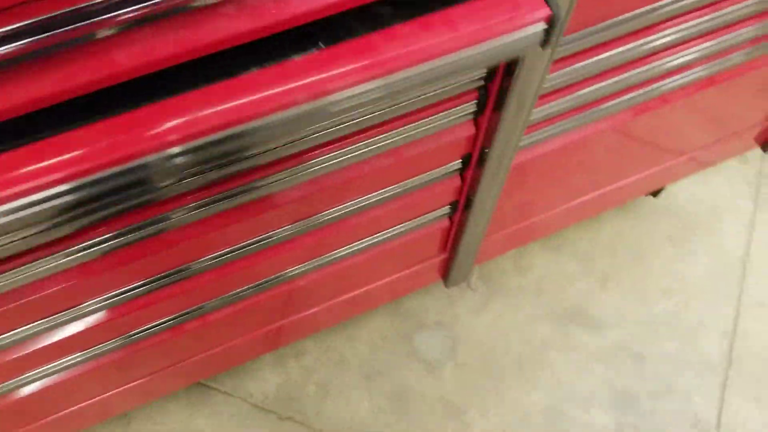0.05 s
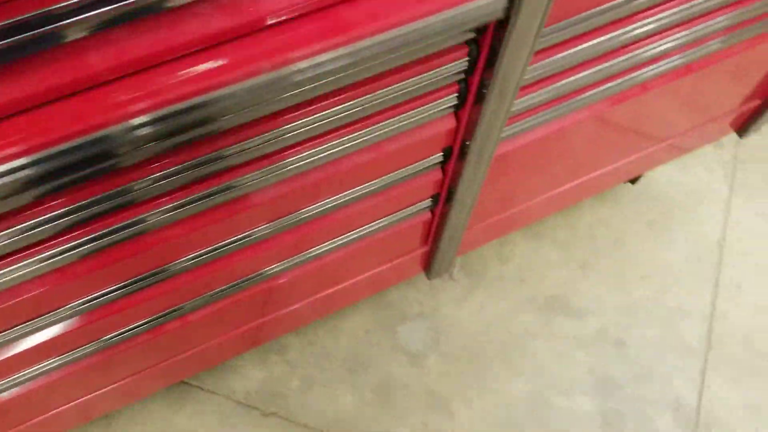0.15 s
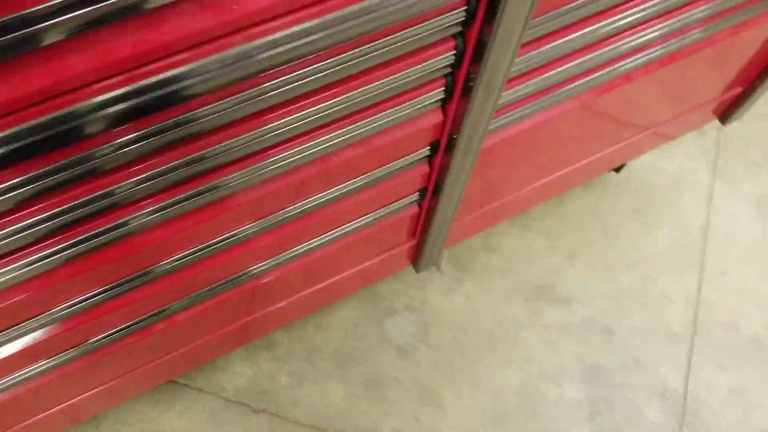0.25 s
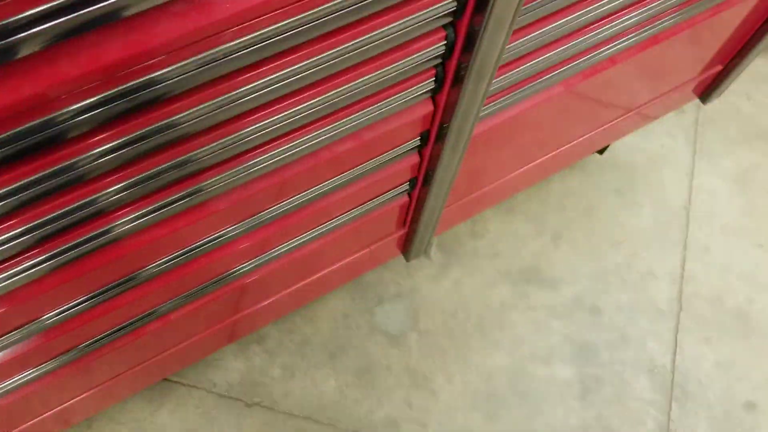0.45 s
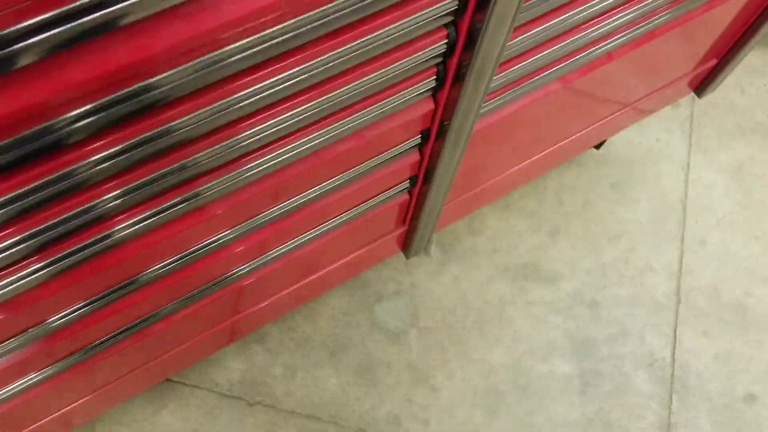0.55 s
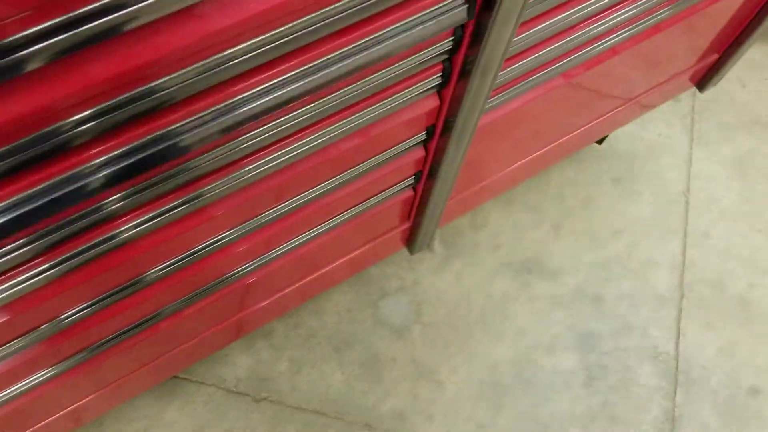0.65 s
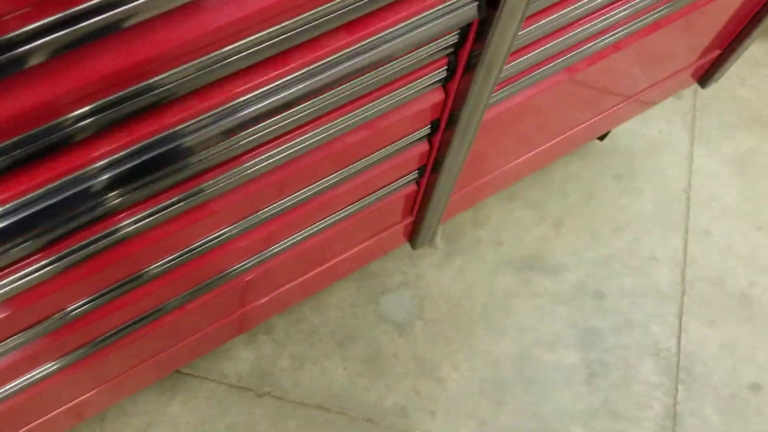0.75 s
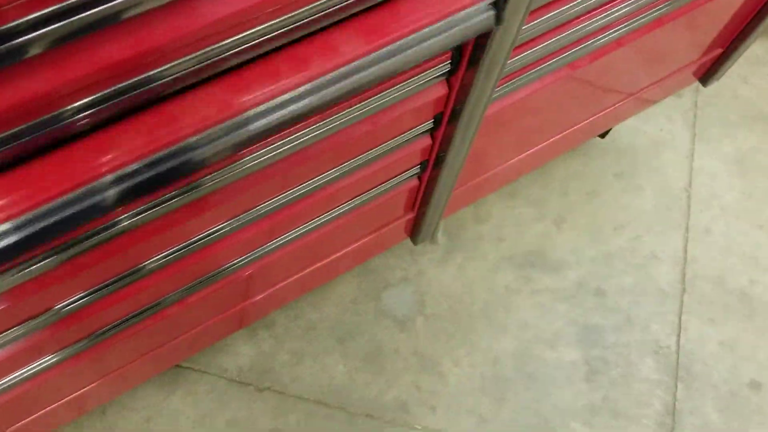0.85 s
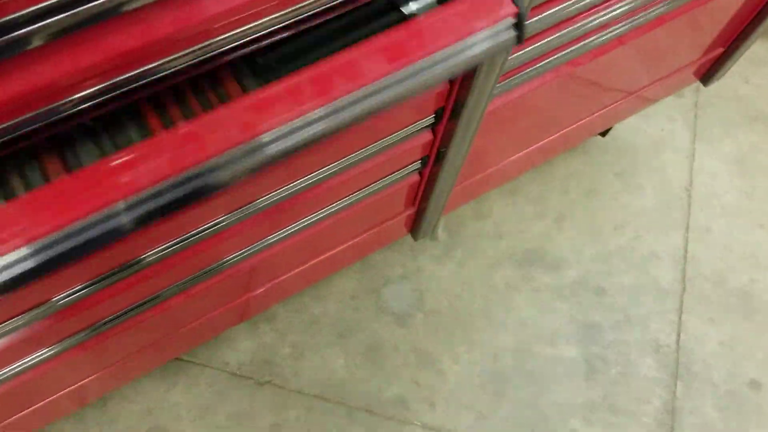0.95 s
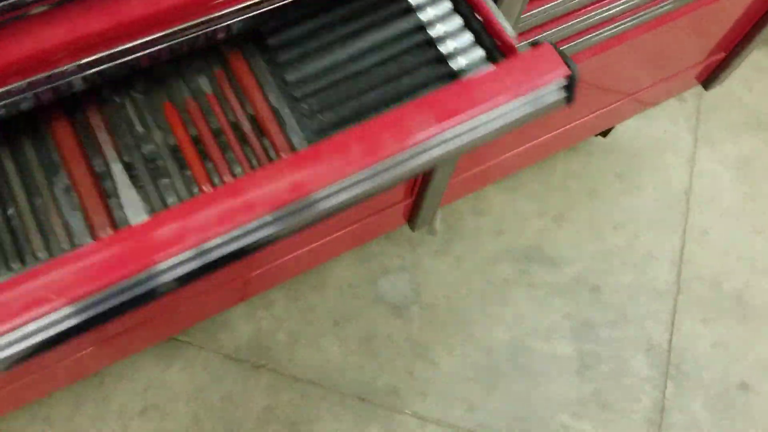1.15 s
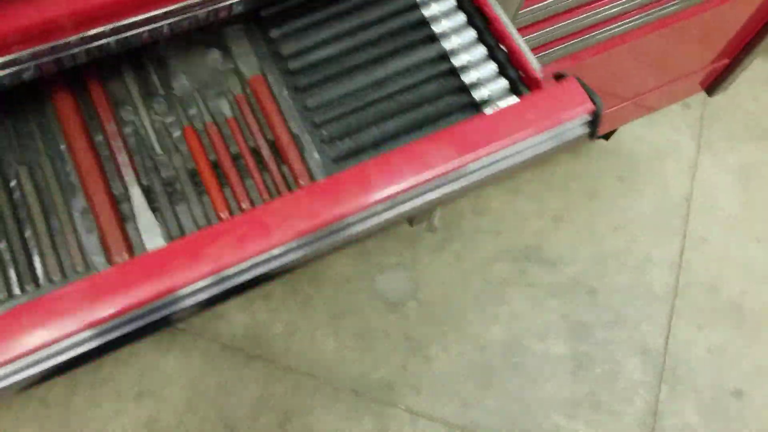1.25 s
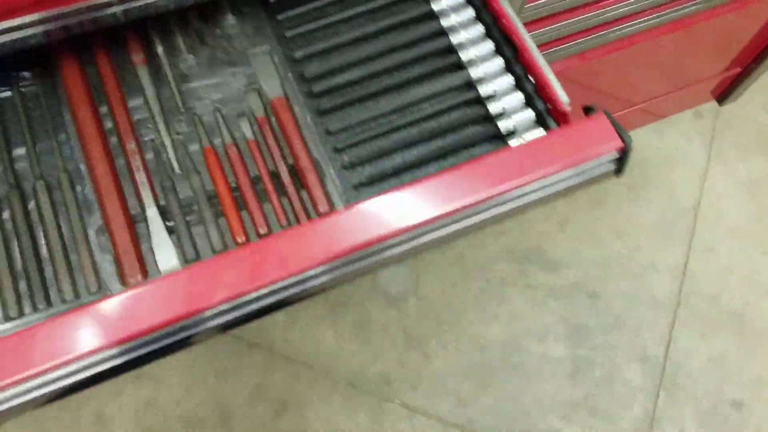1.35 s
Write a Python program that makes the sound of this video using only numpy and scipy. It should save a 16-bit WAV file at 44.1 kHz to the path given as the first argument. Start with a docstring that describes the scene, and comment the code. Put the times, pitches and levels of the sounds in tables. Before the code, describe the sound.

Metal drawer slamming closed in a workshop, followed by a click and faint rolling slides.

```python
"""Over low workshop noise, a steel tool chest drawer rolls shut with a few light clicks.
Its slides and catch clash in a quick burst (0.22 s), it hits its stop (0.30 s) and the cabinet booms;
the sheet steel rings on in the room. A latch clicks (0.60 s) and the next drawer rolls out
with faint ticks of its slides and chimes of loose tools."""
import sys
import numpy as np
from scipy import signal
from scipy.fft import rfft, irfft
from scipy.io import wavfile
from scipy.ndimage import uniform_filter1d

SR = 44100
rng = np.random.default_rng(int(sys.argv[2]) if len(sys.argv) > 2 else 0)


def digitize_waveform(pressure):
    """Quantize a signal to 16-bit integers and store it at the path in sys.argv[1].

    Rows of a 2-D input are taken as channels; values are limited to [-1, 1].
    """
    field = np.atleast_2d(pressure).T
    bounded = np.clip(field, -1, 1)
    quanta = np.round(bounded * 32767).astype(np.int16)
    wavfile.write(sys.argv[1], SR, quanta)


N = 61739
T = np.arange(N) / SR
FFT_SIZE = 2 ** 17
FREQS_HZ = np.maximum(np.arange(FFT_SIZE // 2 + 1) * SR / FFT_SIZE, 1)

# light contacts of latch and slides: start_s, level_db, treble_db, body_db, t60_s, left_right_db
LATCH_CLICKS = [(.051, -24, -5, -10, 0.037, 4), (0.068, -49, 11, -1, 0.066, 4),
                (0.074, -41, 9, -1, 0.023, 0.03), (.455, -21, -11, -54, 0.18, -3),
                (0.516, -30, -3, -9, 0.087, 1), (.595, -28.5, 4, -12, 0.03, 4),
                (.6016, -10.5, -2.5, -0.5, 0.049, 0.5), (.6435, -29, 3, 14, 0.033, -5),
                (0.656, -37, -11, 21, .06, -13), (0.701, -37, 1, 5, 0.12, 0),
                (0.816, -42.5, 6.5, 3, 0.24, 3), (.897, -46.5, 4, 1, 0.16, 0),
                (0.96, -53, 7, 0.5, 0.082, 0), (.993, -43, 6.5, 5, 0.12, 1.5),
                (1.106, -47.5, -2, -1.5, 0.18, 0.5), (1.153, -51, 7, 1.5, .05, 1.5),
                (1.326, -40.5, -15, 17, 0.036, -7.5)]
# steel-on-steel blows on closing: start_s, level_db, treble_db, body_db, t60_s, left_right_db
CLOSING_CLASHES = [(0.2176, -1, -15.5, 3, 0.048, -0.5), (0.2242, 4, -2.5, -12, 0.036, -0.5),
                   (0.2336, -1, -3, -1.5, 0.076, 3), (0.2388, -19, -5, 10, 0.03, 3.5),
                   (0.2469, -9, -2.5, 12.5, 0.054, -2), (0.2567, 1, 5.5, 5.5, 0.024, 1.5),
                   (.267, -2, -9, -11, 0.14, -1), (0.2784, -6, 5.5, -20.5, 0.057, -2.5),
                   (0.2866, -0.5, -0.5, -3.5, 0.086, 2.5), (0.2917, 2.5, -3, -7.5, 0.062, -6),
                   (.298, -3.5, -6, 2, 0.085, 1), (.308, -8.5, 4.5, -13, 0.088, -2)]
# impact on the stop and rebounds: start_s, level_db, contact_s, pitch_hz
STOP_HITS = [(0.2957, -2, 0.0023, 147), (.312, -0.5, 0.0032, 98), (0.3201, -1, 0.00075, 217),
             (0.3223, -7.5, 0.0016, 80), (0.35, -8, .003, 122)]


def undb(db):
    return 10 ** (np.asarray(db) / 20)


def unit_rms(x):
    return x / np.sqrt(np.mean(x ** 2))


def over_hz(table):
    """Rows of freq_hz, value, interpolated in log frequency."""
    hz, value = np.array(table).T
    return np.interp(np.log(FREQS_HZ), np.log(hz), value)


def filtered(x, gain):
    return irfft(rfft(x, FFT_SIZE) * gain)[..., :N]


def colour(x, spectrum):
    """Minimum-phase filter; keeps the power of white noise."""
    cepstrum = irfft(np.log(unit_rms(undb(over_hz(spectrum)))))
    cepstrum[1:FFT_SIZE // 2] *= 2
    cepstrum[FFT_SIZE // 2 + 1:] = 0
    return filtered(x, np.exp(rfft(cepstrum)))


def decay(t, t60_s):
    return np.exp(-np.log(1000) * t / t60_s)


def ring(hz, t60_s):
    return np.sin(2 * np.pi * hz * T) * decay(T, t60_s)


def add(out, x, start_s):
    i = int(np.clip(start_s * SR, 0, N - 1))
    out[..., i:i + x.shape[-1]] += x[..., :N - i]


def stereo_noise(correlation, count=N):
    mid, side = rng.standard_normal((2, count))
    return mid * np.sqrt((1 + correlation) / 2) + np.array([side, -side]) * np.sqrt((1 - correlation) / 2)


def diffuse_noise(corner_hz=600):
    """Noise from all around: channels alike in the bass only."""
    mid, side = rng.standard_normal((2, N))
    coherence = .97 / (1 + (FREQS_HZ / corner_hz) ** 4)
    side = filtered(side, np.sqrt((1 - coherence) / 2))
    return filtered(mid, np.sqrt((1 + coherence) / 2)) + np.array([side, -side])


def struck_modes(modes, blows):
    """Each blow adds energy to every mode, which then rings down."""
    energy, out = np.zeros(N), 0
    for start_s, level_db, *_ in blows:
        add(energy, undb([level_db]) ** 2, start_s)
    for hz, level_db, t60_s in modes:
        stored = signal.lfilter([1], [1, -decay(2 / SR, t60_s)], energy)
        out = out + undb(level_db) * np.sqrt(stored) * np.sin(2 * np.pi * (hz * T + rng.random()))
    return out


def steel_blows(blows, spectrum, tick_db, contact_s=.0008):
    """Each contact ticks, cracks briefly and sets the panels shimmering."""
    cracks, pushes = np.zeros((2, N)), np.zeros(N)
    t = T[:SR // 5]
    highpass, lowpass = signal.butter(2, 5000, "high", fs=SR), signal.butter(2, 1000, fs=SR)
    for start_s, level_db, treble_db, body_db, t60_s, left_right_db in blows:
        crack = stereo_noise(.37, len(t)) * decay(t, t60_s) * (1 - np.exp(-t / contact_s))
        crack[:, int(contact_s * SR)] += undb(tick_db)
        treble, body = signal.filtfilt(*highpass, crack), signal.filtfilt(*lowpass, crack)
        crack = crack + (undb(treble_db) - 1) * treble + (undb(body_db) - 1) * body
        channel_db = level_db + np.array([[left_right_db], [-left_right_db]]) / 2
        add(cracks, crack * undb(channel_db), start_s)
        add(pushes, undb([level_db]), start_s + .0002 * rng.standard_normal())
    panels = undb(-38.5) * colour(stereo_noise(.3), spectrum) * decay(T, t60_s=.42)
    return undb(-10) * colour(cracks, spectrum) + filtered(pushes, rfft(panels, FFT_SIZE))


def shop_noise():
    """Steady background: low rumble, faint hiss."""
    # freq_hz, level_db
    spectrum = [(25, -5), (55, 9), (300, -1.5), (1000, -24), (4000, -10), (16000, -48)]
    return undb(-64.5) * unit_rms(colour(diffuse_noise(), spectrum))


def slides():
    """Ball slides rumble with a fine, uneven grain."""
    # rolling noise: freq_hz, level_db
    spectrum = [(25, -16.5), (55, 3.5), (90, -1), (150, -8.5), (260, 1), (450, -6.5), (800, -11),
                (1200, -17), (2000, -15), (4000, -32), (6000, -32), (7500, -30.5), (9000, -42),
                (12000, -34.5), (16000, -39.5)]
    # rolling tone: time_s, mids_db, treble_db
    tone = [(0, -1.5, 1), (.1, 4, 0), (.2, 4.5, 2.5), (0.701, -2, -4), (1.051, -2, -5.5), (1.22, -1.5, 5.5),
            (1.33, -3.5, 3), (1.4, -4, -3.5)]
    # rolling level: time_s, level_db
    envelope = [(0, -43.5), (.07, -48), (.14, -52), (.21, -50.5), (.33, -33), (.62, -45), (.8, -47.5),
                (1.0, -50.5), (1.15, -53), (1.3, -51.5), (1.4, -55.5)]
    grain_db = unit_rms(uniform_filter1d(rng.standard_normal(N), size=220))
    roll = unit_rms(colour(diffuse_noise() * undb(grain_db), spectrum))
    upper, treble = (filtered(roll, 1 / (1 + (hz / FREQS_HZ) ** 4)) for hz in (1000, 3600))
    time_s, mids_db, treble_db = np.array(tone).T
    mids = (upper - treble) * undb(np.interp(T, time_s, mids_db))
    roll = roll - upper + mids + treble * undb(np.interp(T, time_s, treble_db))
    return roll * undb(np.interp(T, *np.array(envelope).T))


def latch():
    """Latch and slides click and ring briefly."""
    # click: freq_hz, level_db
    spectrum = [(40, -45), (400, -11.5), (1200, -8.5), (1800, -0.5), (2400, -1), (3200, -2), (3800, -9.5),
                (4500, -6), (5800, -14.5), (7500, -16), (9000, -18), (12500, -17), (16000, -7)]
    # latch ring: pitch_hz, level_db, t60_s
    modes = [(1760, 3.5, 0.035), (2103, -2.5, 0.033), (2232, 0, 0.041), (2660, 0, 0.045), (2936, 0, 0.054),
             (3194, -14, 0.071), (3380, -6.5, 0.078), (4420, -6.5, 0.04)]
    clicks = steel_blows(LATCH_CLICKS, spectrum, tick_db=13.5)
    return clicks + undb(-20) * struck_modes(modes, LATCH_CLICKS)


def sheet_steel():
    """Clicks and clashes ring the drawer's sheet steel; mode phases differ per channel."""
    # drawer modes: pitch_hz, level_db, t60_s
    modes = [(1469, -3, .3), (1532, -2, .3), (1758, -2, .65), (1804, 1, .5), (1923, -2, .5), (2069, -2, .5),
             (2106, 0, .45), (2311, -1, .65), (2610, -4, .55), (3084, -2, .55), (3156, -1, .6),
             (3415, -1, .55), (4188, -4, .55), (4609, -3, .6), (7662, -10, .55)]
    return undb(-42.5) * np.array([struck_modes(modes, CLOSING_CLASHES + LATCH_CLICKS) for _ in range(2)])


def clashes():
    """Slides and catch clash, steel on steel, as the drawer closes."""
    # clash: freq_hz, level_db
    spectrum = [(40, -48), (100, -16.5), (200, -12.5), (450, -9.5), (700, -9.5), (1100, -9.5), (1500, -1),
                (2000, 2.5), (2600, -3), (3200, -1.5), (4500, -4.5), (6400, -12), (7500, -12.5),
                (8600, -16.5), (10800, -14.5), (12500, -15.5), (16000, -15)]
    return steel_blows(CLOSING_CLASHES, spectrum, tick_db=7.5)


def knock():
    """The drawer's weight hits the stop: short low thud, dull shudder."""
    # shudder: freq_hz, level_db
    spectrum = [(20, -27.5), (50, 0.5), (100, 1.5), (170, -0.5), (260, 2), (400, -4), (700, -10),
                (1200, -23), (3000, -40.5)]
    force, thud = np.zeros(N), np.zeros(N)
    for start_s, level_db, contact_s, pitch_hz in STOP_HITS:
        push = undb(level_db) * (1 - np.exp(-T / contact_s))
        add(force, push * decay(T, t60_s=.17), start_s)
        add(thud, push * ring(pitch_hz, t60_s=.047), start_s)
    shudder = colour(force * stereo_noise(.95), spectrum)
    return undb(-14) * thud + undb(-27) * shudder


def cabinet():
    """The chest's low modes boom on after the knock."""
    # cabinet modes: pitch_hz, level_db, t60_s
    modes = [(54, 4.5, 1.15), (72, -5, .5), (99.5, 2, .6), (134, -2, .5), (161, -2, .4), (179.3, 0, .7),
             (207.5, -1, .7), (260, 3, .85), (306, 0, .55), (407, 2.5, .47), (461, -7, .45), (497, -5, .4),
             (568, -5, .4), (684, 0, .27)]
    boom = struck_modes(modes, STOP_HITS)
    return undb(-36) * signal.lfilter(*signal.butter(2, 900, fs=SR), boom)


def tools(min_beat_hz=78):
    """Loose tools touch and ring faintly, each with two close modes that beat."""
    # tool contacts: start_s, pitch_hz, level_db, t60_s
    chimes = [(.69, 5090, -53, .22), (.722, 5090, -52, .11), (.6, 6320, -65, 1.6), (.993, 4330, -56, .09),
              (.993, 5100, -57, .08), (1.042, 4170, -59, .13), (1.106, 4230, -60, .08),
              (1.112, 4580, -62, .12)]
    out = np.zeros(N)
    for start_s, pitch_hz, level_db, t60_s in chimes:
        twin_hz = pitch_hz + min_beat_hz * (1 + rng.random())
        add(out, undb(level_db) * (ring(pitch_hz, t60_s) + ring(twin_hz, t60_s / 2)), start_s)
    return out


def reverb(direct, low_cut_hz=110, build_s=.0076):
    """Hard-floored room; the tail dies sooner in the treble."""
    # room decay: freq_hz, level_db, t60_s
    bands = [(40, -10, 0.79), (120, -1, 1.55), (258, -7, 1.39), (497, -2, 0.78), (926, 3, 0.93),
             (2480, -3, 1.026), (4880, -3.5, 0.84), (8860, 4, 0.47), (16000, -3.5, 0.36)]
    radiated = signal.lfilter(*signal.butter(2, low_cut_hz, "high", fs=SR), direct.mean(axis=0))
    noise, tail = rfft(diffuse_noise(), FFT_SIZE), 0
    for hz, level_db, t60_s in bands:
        band = over_hz([(row[0], row[0] == hz) for row in bands])
        tail = tail + irfft(noise * band)[:, :N] * undb(level_db) * decay(T, t60_s)
    tail = tail * (1 - np.exp(-T / build_s)) * np.sqrt(2 * np.log(1000) / SR)
    return undb(-5) * filtered(radiated, rfft(tail, FFT_SIZE))


def scene():
    """Drawers close up; the impacts excite the room."""
    impacts = clashes() + latch() + knock()
    return impacts + sheet_steel() + cabinet() + tools() + reverb(impacts) + slides() + shop_noise()


def record(dry, right_lag_s=.0001, ceiling=.88, top_hz=15800):
    """Stereo microphone: unequal colour, right channel late, peaks rounded, top cut."""
    # channel balance: freq_hz, left_right_db
    balance = [(100, 1), (600, 2.5), (1400, -0.5), (2100, -2), (2900, 8), (4200, 7), (5400, 9.5), (6300, 5),
               (7600, 14), (9000, -3), (11000, 4), (15000, 0.5)]
    tilt_db = over_hz(balance) / 2
    lag = np.exp(-2j * np.pi * FREQS_HZ * right_lag_s)
    stereo = filtered(dry, np.array([undb(tilt_db), undb(-tilt_db) * lag]))
    rounded = stereo / (1 + (stereo / ceiling) ** 6) ** (1 / 6)
    return signal.sosfilt(signal.ellip(10, .2, 80, top_hz, fs=SR, output="sos"), rounded)


dry = scene()
out = record(dry)
digitize_waveform(out)
```